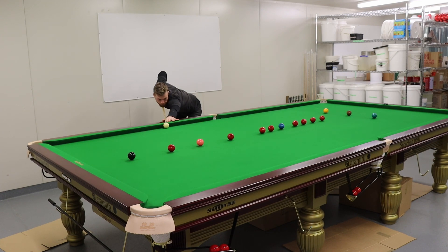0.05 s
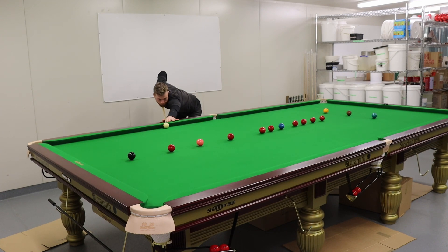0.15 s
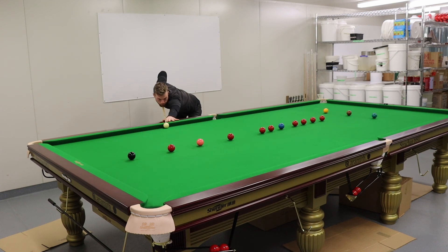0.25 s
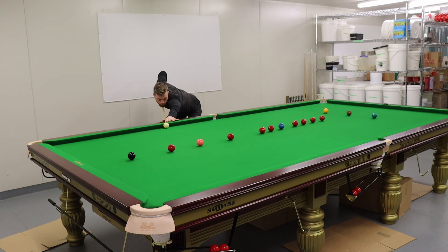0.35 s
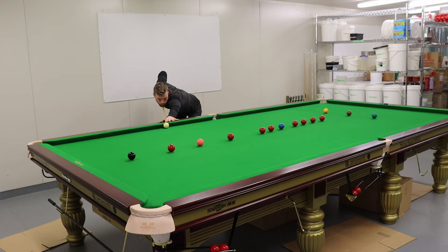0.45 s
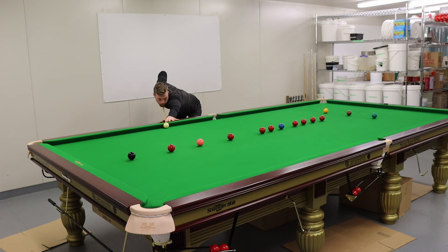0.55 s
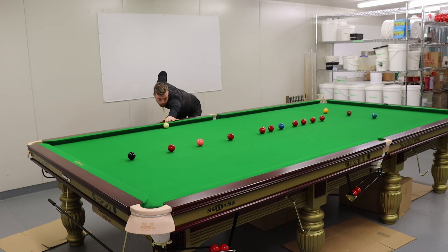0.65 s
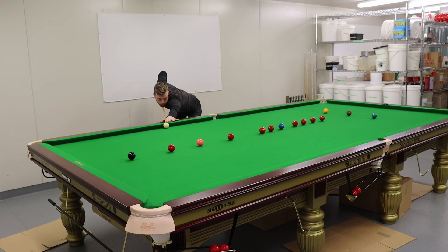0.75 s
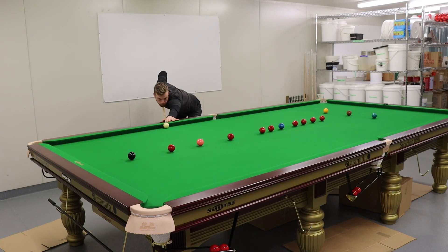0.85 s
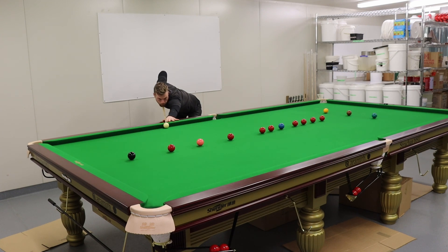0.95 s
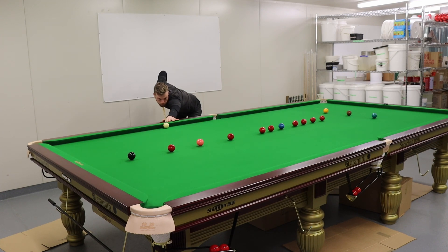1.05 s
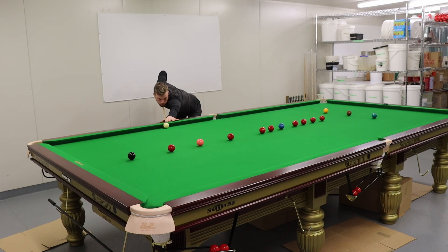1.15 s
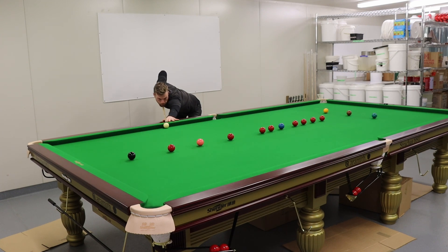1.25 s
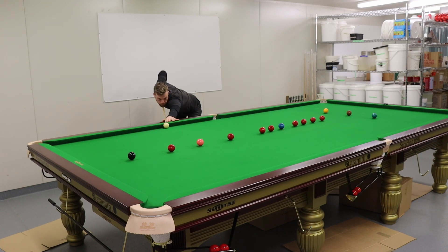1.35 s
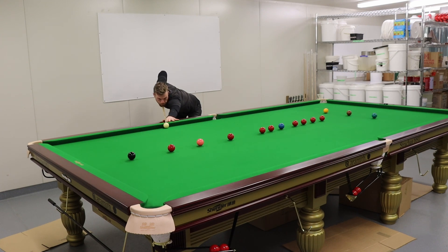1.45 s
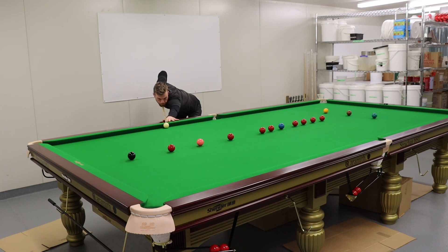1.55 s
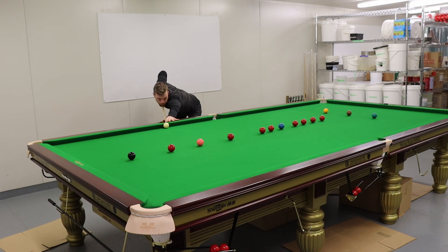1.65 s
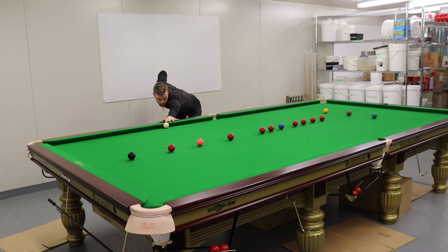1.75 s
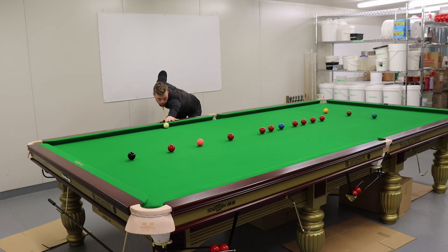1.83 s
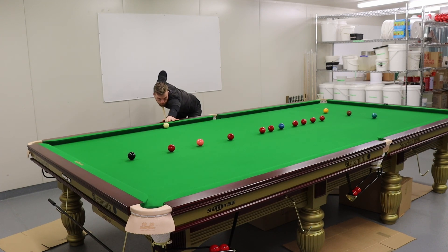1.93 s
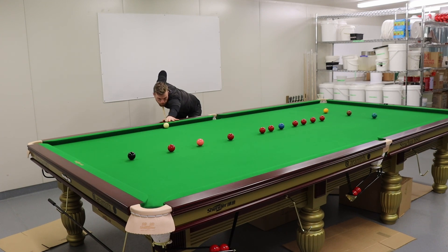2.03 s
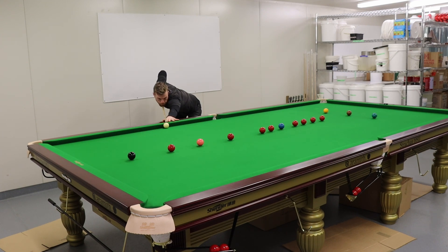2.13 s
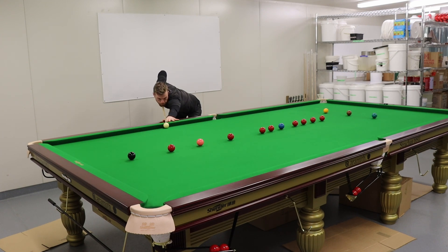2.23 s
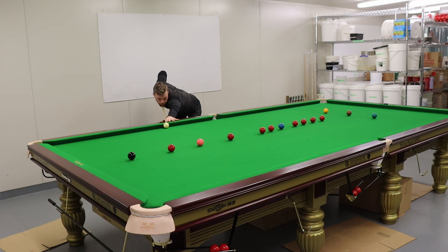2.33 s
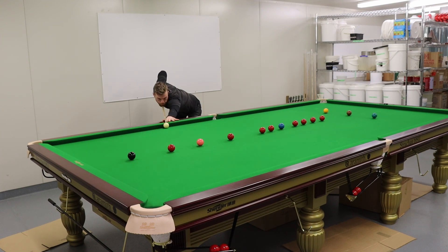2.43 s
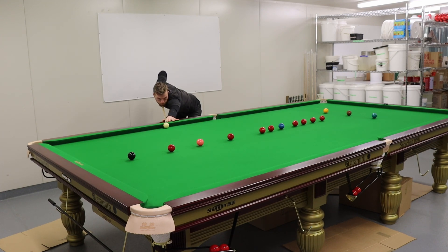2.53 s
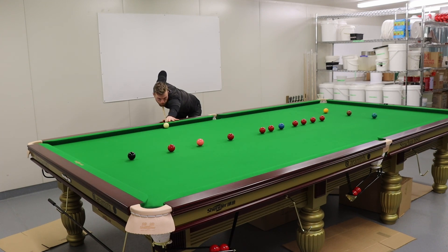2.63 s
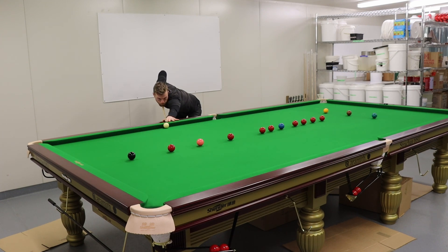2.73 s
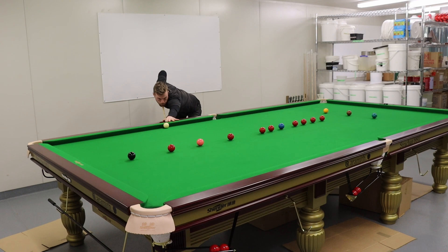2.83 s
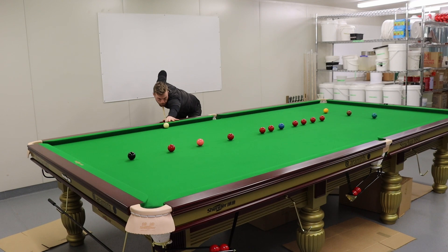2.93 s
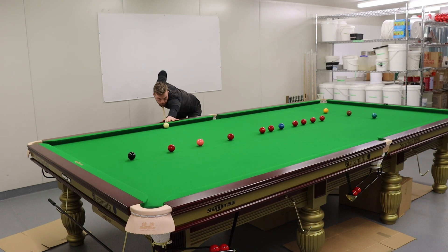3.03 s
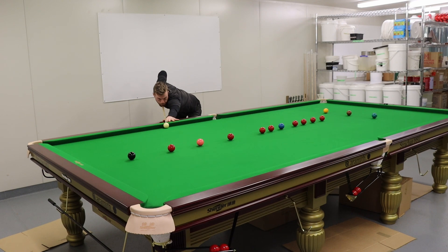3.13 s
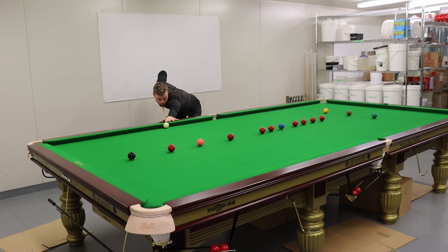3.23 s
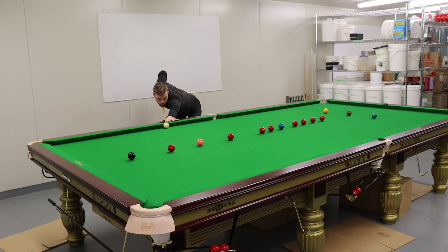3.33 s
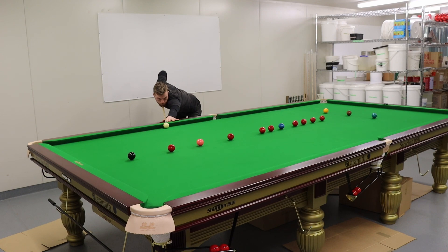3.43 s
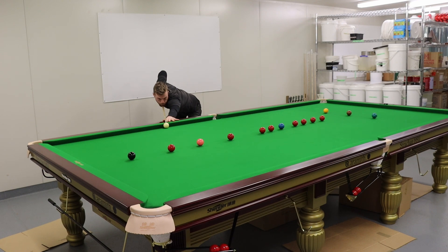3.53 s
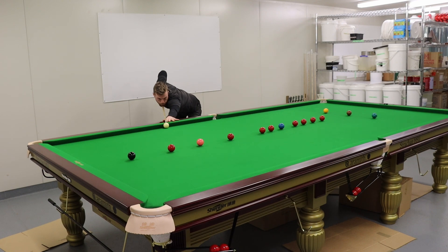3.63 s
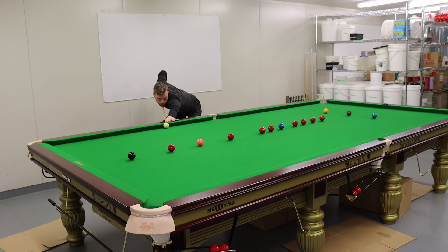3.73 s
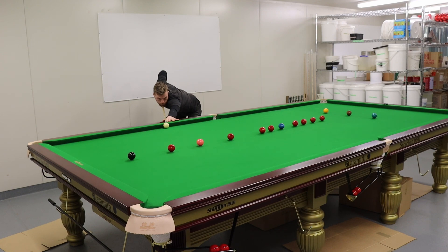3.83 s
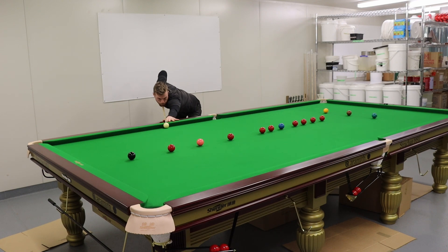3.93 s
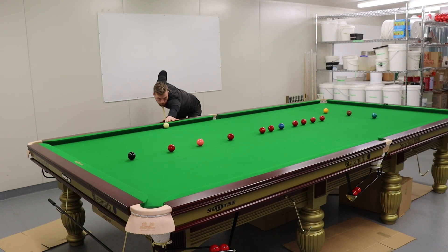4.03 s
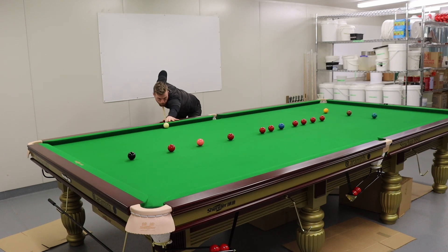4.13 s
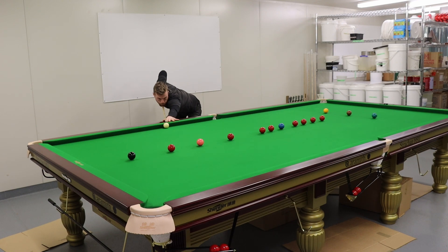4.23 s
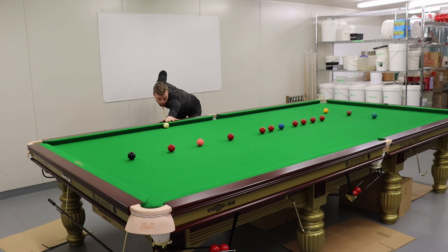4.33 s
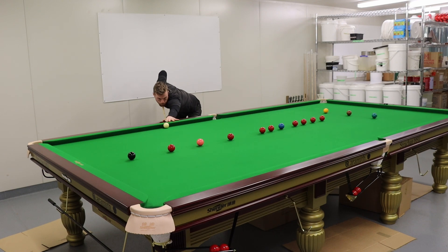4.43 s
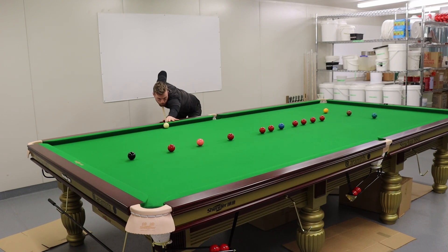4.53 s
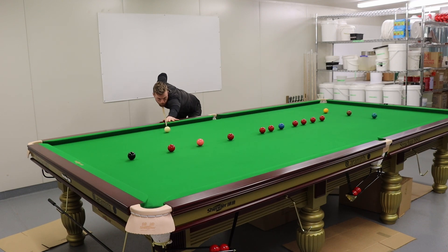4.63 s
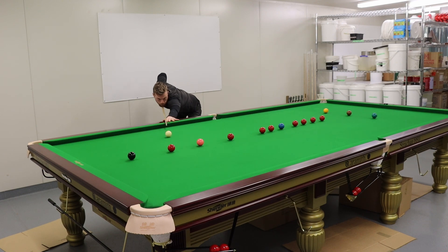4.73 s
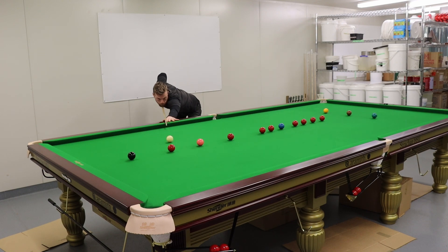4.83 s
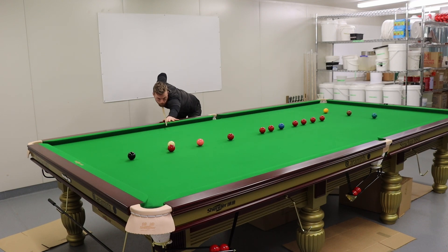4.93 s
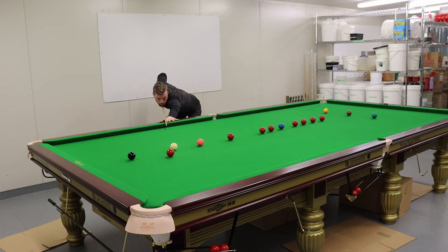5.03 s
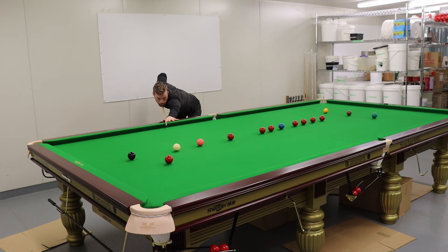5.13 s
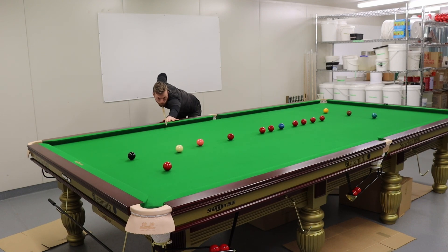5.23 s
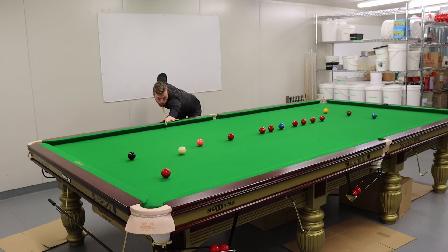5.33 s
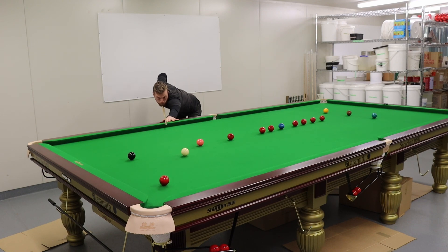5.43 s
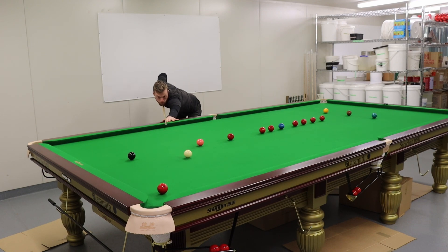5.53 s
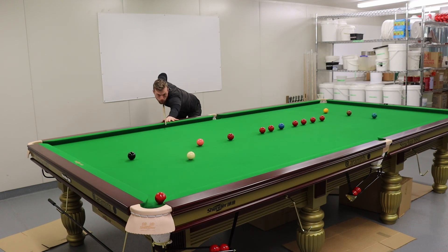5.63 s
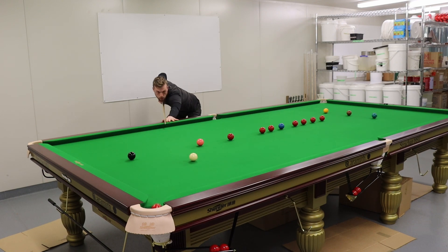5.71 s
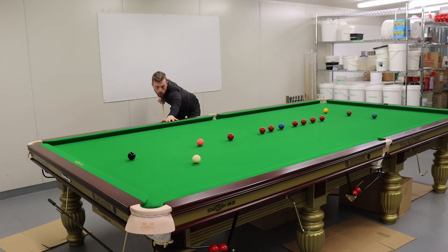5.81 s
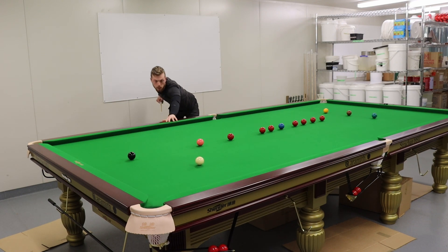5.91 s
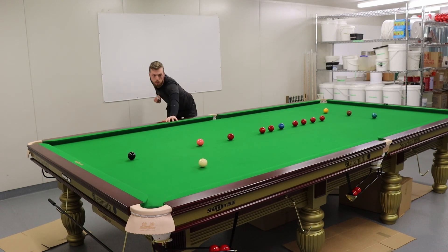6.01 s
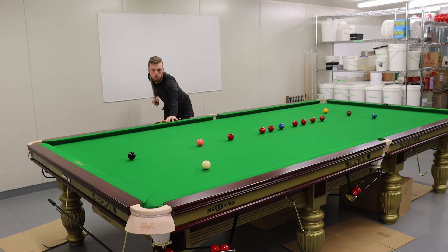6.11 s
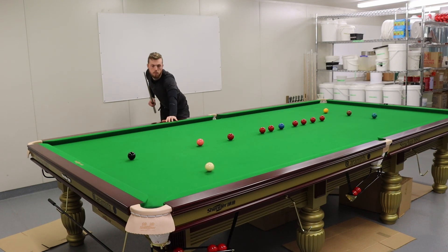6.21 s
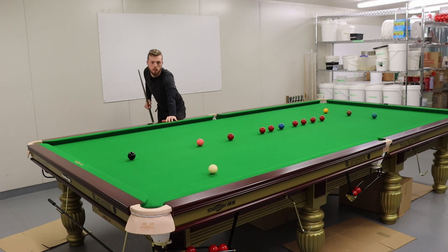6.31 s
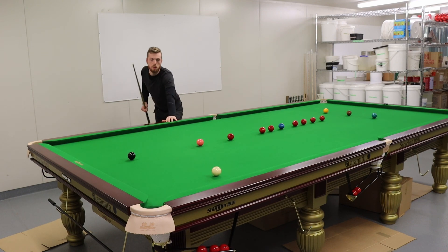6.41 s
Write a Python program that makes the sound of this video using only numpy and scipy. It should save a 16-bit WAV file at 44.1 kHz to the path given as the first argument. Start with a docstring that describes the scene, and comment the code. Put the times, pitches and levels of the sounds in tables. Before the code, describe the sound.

Low ventilation hum and faint cue strokes, then a woody cue strike, a very loud ball clack, and a red rattling into a pocket.

```python
"""Humming ventilation and soft strokes of a cue over the bridge hand open a snooker shot in a bare, ringing room.
The leather tip thuds, the cue cracks and rings (decaying sines); the cue ball clacks into a red (a filtered
contact pulse), so loud that the limiter ducks late and the clack clips. The red then rattles through the
pocket onto its wire runner (noise chatter exciting metal modes). Slides, rolling balls and air are shaped
noise; fan and duct tones waver, and a thin whine lies on top."""
import sys
import numpy as np
from scipy import signal
from scipy.io import wavfile

SR = 44100
rng = np.random.default_rng(int(sys.argv[2]) if len(sys.argv) > 2 else 0)


def dump_mix(stems):
    """Bounce the given channels to the path in sys.argv[1] as a 16-bit WAV at rate SR."""
    frames = np.atleast_2d(stems).T  # one column per channel
    limited = np.clip(frames, -1, 1)  # hard clip at full scale
    pcm = np.round(limited * 32767).astype(np.int16)
    wavfile.write(sys.argv[1], SR, pcm)


N = 285194  # length in samples

# Cue tip meeting the ball: start_s, level_db
CUE_HITS = [(4.6387, -7)]
# Bending modes of the wooden cue, some split in two by its grain: pitch_hz, level_db, t60_s
CUE_MODES = [(226, -11, .4), (263, -13, .4), (441, -20, .15), (646, -15, .15), (844, -2, .25),
             (1000, -6, .1), (1077, 1, .2), (1346, 0, .27), (1561, -7, .18), (1861, -8, .15),
             (2185, -5, .12), (2222, -3, .24), (2560, -5, .1), (2605, -3, .18), (2887, -7, .17),
             (3210, -5, .13), (3264, -3, .17), (3629, -6, .18), (4018, -9, .18), (4371, -11, .12),
             (4834, -15, .12)]


def cue_strike(tip_ms=0.44, thud_db=2.0, crack_s=0.022, crack_hz=4300, snap_db=-31.5, snap_hz=12000):
    """The leather tip thuds on the ball, the ferrule cracks and the shaft rings on in its bending modes."""
    out = np.zeros(N)
    t = np.arange(SR) / SR
    burst = rng.standard_normal(SR) * np.exp(-t / crack_s) * (1 - np.exp(-t / 0.0015))
    body = cut(burst, crack_hz, "low", order=6)
    snap = from_db(snap_db) * cut(burst, snap_hz, "low", order=6)
    crack = cut(body + snap, 500, "high")
    wood = from_db(-15) * ringing(CUE_MODES) + from_db(-2.5) * crack
    thud = cut(contact(tip_ms), 440, "high")
    for start_s, level_db in CUE_HITS:
        add(out, start_s, from_db(level_db) * wood)
        add(out, start_s, from_db(level_db + thud_db) * thud)
    return out


# Ball on ball: start_s, level_db
CLACKS = [(5.0684, 13.5)]


def ball_clack(contact_ms=0.24, radiate_hz=1900, top_hz=3200):
    """Balls are small and radiate only the fast part of their brief contact: a click of a cycle or two."""
    out = np.zeros(N)
    for start_s, level_db in CLACKS:
        radiated = cut(contact(contact_ms), radiate_hz, "high", order=3)
        click = cut(radiated, top_hz, "low", order=4)
        # the hard surfaces add a trace of treble
        tick = from_db(-17) * cut(signal.unit_impulse(len(click)), 6500, "high")
        add(out, start_s, from_db(level_db) * (click / np.abs(click).max() + tick))
    return out


# The red knocking in the pocket: start_s, level_db, decay_s (time constant), treble_db,
# runner_db (ring of the runner), hoop_db (ring of its thin wire hoop)
POCKET_KNOCKS = [(6.01, -48, 0.016, 7, -20, 12), (6.070, -25, 0.011, -9, -20, 3),
                 (6.076, -23.5, 0.0042, -1.5, -20, -5), (6.184, -27.5, 0.022, -19, -0.5, -15),
                 (6.198, -13.5, 0.005, -3, -9, -6), (6.201, -16, 0.015, -1, -12, -2),
                 (6.213, -24.5, 0.013, 7, -18, -8)]
# Tone colour of a knock: pitch_hz, gain_db
KNOCK_COLOUR = [(150, -21), (400, -6.5), (800, -5), (1500, -3), (2600, -2.5), (4200, -2), (5600, -10),
                (8000, -5.5), (12000, -6), (15500, -21)]
# Modes of the wire runner: pitch_hz, level_db, t60_s
RUNNER_MODES = [(4100, -23, .015), (4290, -23, .028), (4440, -25, .025)]
# Modes of the wire hoop: pitch_hz, level_db, t60_s
HOOP_MODES = [(8500, -35, .01), (12030, -32, .03), (12220, -33, .04)]


def pocket_rattle(grain_db=2.5, bright_hz=5000):
    """Each knock is a short chatter of tiny contacts that also sets the runner and its hoop ringing."""
    blows, metal = np.zeros(N), np.zeros(N)
    t = np.arange(SR // 4) / SR
    for start_s, level_db, decay_s, treble_db, runner_db, hoop_db in POCKET_KNOCKS:
        grain, size = rng.standard_normal((2, len(t)))
        # a second random draw makes the contacts uneven in strength
        uneven = rms_one(grain * from_db(grain_db * np.clip(size, -2, 2)))
        chatter = from_db(level_db) * uneven * np.exp(-t / decay_s)
        dull = cut(chatter, bright_hz, "low", order=1)
        add(blows, start_s, dull + from_db(treble_db) * (chatter - dull))
        wires = from_db(runner_db) * ringing(RUNNER_MODES) + from_db(hoop_db) * ringing(HOOP_MODES)
        add(metal, start_s, signal.fftconvolve(chatter, wires))
    knocks = np.zeros(N)
    for k, hz in enumerate(CENTRES_HZ):
        # neighbouring bands alternate in sign
        knocks += (-1) ** k * from_db(at_hz(KNOCK_COLOUR, hz)) * cut(blows, band_edges(hz), "band")
    return knocks + metal


# Strokes of the cue over the bridge hand, the last one the shot: middle_s, level_db, length_s
STROKES = [(.06, -59, .13), (1.09, -65, .24), (1.56, -61.5, .14), (1.94, -63.5, .2), (2.39, -59, 0.14),
           (2.67, -62.5, 0.15), (3.14, -64, 0.21), (4.29, -64.5, .33), (4.63, -58, 0.073)]
# Faint rustle of the player at rest; it grows as he straightens up
REST_DB, RISE_START_S, RISE_DB_PER_S = -79, 5.09, 20


def rubbing():
    """Gain of the friction noise: the strokes of the cue, joined by the player getting up."""
    rising_s = np.maximum(np.arange(N) / SR - RISE_START_S, 0)
    rustle = from_db(REST_DB + RISE_DB_PER_S * rising_s)
    return np.hypot(swells(STROKES), rustle)


# Colour of the sliding cue and the rustle: pitch_hz, density_db (relative, per Hz)
RUB_COLOUR = [(800, -17), (2200, 1.5), (3200, 7.5), (4500, 2), (8500, -3), (12300, 2.5), (15000, -26)]


def cue_slide():
    """Friction of cue and clothing: coloured noise that follows the speed of the movements."""
    return rubbing() * coloured_noise(RUB_COLOUR)


# Low bumps as the red enters the pocket and rolls off along the runner: middle_s, level_db, length_s
BUMPS = [(5.96, -46, .13), (6.105, -40.5, 0.041), (6.19, -39.5, 0.075), (6.45, -39.5, 0.12)]
# The slate rumbles once the cue ball is sent off and again when the red drops
SLATE_SHOT_DB, SLATE_DROP_DB = -51.5, -53


def rolling_balls():
    """Rolling weight shakes the slate in the deep bass and bumps the pocket a little higher up."""
    shot = roll(CUE_HITS[0][0], SLATE_SHOT_DB)
    drop = roll(POCKET_KNOCKS[1][0], SLATE_DROP_DB)
    slate = rumble(np.hypot(shot, drop), low_hz=28, high_hz=72.0)
    return slate + rumble(swells(BUMPS), low_hz=174, high_hz=300)


def roll(start_s, level_db, build_s=0.02, fade_db_per_s=16):
    """Gain of a ball set rolling: a quick build-up, then a steady fade as it slows."""
    age_s = np.maximum(np.arange(N) / SR - start_s, 0)
    return from_db(level_db - fade_db_per_s * age_s) * (1 - np.exp(-age_s / build_s))


def rumble(gain, low_hz, high_hz):
    """Low noise of a rolling ball: one band of noise under a gain curve."""
    return gain * rms_one(cut(rng.standard_normal(N), [low_hz, high_hz], "band"))


def swells(rows):
    """Gain of movements that speed up and slow down again: one bell per row."""
    t = np.arange(N) / SR
    gain = np.zeros(N)
    for middle_s, level_db, length_s in rows:
        gain += from_db(level_db) * np.exp(-2 * ((t - middle_s) / length_s) ** 2)
    return gain


# Ventilation and hiss: pitch_hz, density_db (relative, per Hz)
AIR_COLOUR = [(25, -31), (64, -22), (90, -15.5), (150, -3.5), (230, -7), (300, -12), (450, -16.5),
              (600, -20.5), (800, -22), (1800, -27), (2250, -38), (4000, -42.5), (8000, -47.5),
              (15500, -51)]
# Fan and duct tones: pitch_hz, level_db (rms before the stereo tilt), waver_hz (cutoff of the wavering)
HUM_TONES = [(97.4, -50.5, 5.6), (151.4, -45.5, 10.6), (231.1, -49.5, 11.8), (353, -50.5, 5),
             (450, -60.5, 7.2), (557.6, -56.5, 3.57), (612, -60.5, 25.5)]


def ventilation(air_db=-41.5, whine_hz=10874, whine_db=-87, tilt_db=1.5):
    """Rushing air, fan and duct tones wavering in strength and phase, and a thin electrical whine."""
    t = np.arange(N) / SR
    out = from_db(air_db) * coloured_noise(AIR_COLOUR)
    for hz, level_db, waver_hz in HUM_TONES:
        # slow noise on cosine and sine; the filter's first second is dropped
        a, b = cut(rng.standard_normal((2, N + SR)), waver_hz, "low")[:, SR:]
        tone = a * np.cos(2 * np.pi * hz * t) + b * np.sin(2 * np.pi * hz * t)
        out = out + from_db(level_db) * rms_one(tone)
    out = out + from_db(whine_db) * rms_one(np.sin(2 * np.pi * whine_hz * t))
    return out * from_db([[tilt_db / 2], [-tilt_db / 2]])


# First reflections, off the table and walls: delay_ms, left_db, right_db
ECHOES = [(2.7, -19, -1), (3.6, -0.5, -17.5), (5.1, 0.5, -35), (6.1, -4, -38), (7.9, -31, -6),
          (10.3, -34, -10), (14.6, -20, -27), (16.5, -10, -6.5)]


def in_room(x, echo_db, wet_db, pan_db):
    """Direct sound, first reflections and the diffuse tail at the two microphones."""
    response = from_db(wet_db) * room_tail()
    response[:, :2] += [[1, 0.006], [0.26, 0.57]]  # direct sound reaches the right microphone a little later
    for delay_ms, left_db, right_db in ECHOES:
        response[:, round(delay_ms * SR / 1000)] += from_db(echo_db + np.array([left_db, right_db]))
    heard = signal.fftconvolve(x[None], response, axes=1)[:, :N]
    return heard * from_db([[pan_db / 2], [-pan_db / 2]])


# Reverberation: pitch_hz, t60_s
ROOM_T60 = [(150, 1.16), (500, 0.66), (1200, 0.75), (2400, 0.95), (4000, 0.73), (7000, 0.53), (13000, 0.32)]


def room_tail(build_s=0.0041, early_db=10.0, early_s=0.0076):
    """Diffuse response of unit energy: it builds up, is boosted early on and dies soonest in the top treble."""
    t = np.arange(3 * SR // 2) / SR
    tail = sum(from_db(-60 * t / at_hz(ROOM_T60, hz)) * band for hz, band in stereo_bands(len(t)))
    tail = tail * (1 - np.exp(-t / build_s)) * from_db(early_db * np.exp(-t / early_s))
    return rms_one(tail) / np.sqrt(len(t))


def coloured_noise(spectrum):
    """Diffuse stereo noise of a given colour, rms 1."""
    return rms_one(sum(from_db(at_hz(spectrum, hz)) * band for hz, band in stereo_bands(N)))


# Likeness of the two channels in diffuse sound: pitch_hz, correlation (no unit)
LIKENESS = [(60, 0.93), (150, .96), (350, 0.89), (700, 0.34), (1400, 0.3), (2800, 0), (6000, 0),
            (14000, 0.032)]
CENTRES_HZ = 25 * 2 ** (np.arange(29) / 3)  # third-octave band centres


def stereo_bands(size):
    """Third-octave bands of stereo noise, alike in the bass and nearly unrelated in the treble."""
    white = rng.standard_normal((2, 2, size + SR // 4))  # the spare quarter second lets the filters settle
    for k, hz in enumerate(CENTRES_HZ):
        # neighbouring bands draw on separate noise
        mid, side = cut(white[k % 2], band_edges(hz), "band")[:, -size:]
        alike = np.clip(at_hz(LIKENESS, hz), -1, 1)
        yield hz, np.sqrt(1 + alike) * mid + np.sqrt(1 - alike) * side * [[1], [-1]]


def band_edges(hz):
    """Edges in Hz of the third-octave band around a centre."""
    return hz * 2 ** (np.array([-1, 1]) / 6)


def contact(ms):
    """Force between two elastic bodies: a half sine to the power 3/2."""
    phase = np.minimum(np.arange(SR // 50) * 1000 / (SR * ms), 1)
    return np.abs(np.sin(np.pi * phase)) ** (3 / 2)


def ringing(modes):
    """One second of a struck body: decaying sines of alternating sign."""
    t = np.arange(SR) / SR
    out = np.zeros(SR)
    for k, (hz, level_db, t60_s) in enumerate(modes):
        out += (-1) ** k * from_db(level_db - 60 * t / t60_s) * np.sin(2 * np.pi * hz * t)
    return out


def from_db(db):
    """Decibels to gain."""
    return 10 ** (np.asarray(db) / 20)


def rms_one(x):
    """Scale to rms 1."""
    return x / np.sqrt(np.mean(x ** 2) + 1e-20)


def at_hz(points, hz):
    """Read a table on a log-frequency axis."""
    table = np.array(points)
    return np.interp(np.log(hz), np.log(table[:, 0]), table[:, 1])


def cut(x, hz, kind, order=2):
    """Butterworth filter."""
    sos = signal.butter(order, np.minimum(hz, SR / 2 - 1), kind, fs=SR, output="sos")
    return signal.sosfilt(sos, x + 1e-18)


def add(track, start_s, sound):
    """Mix a sound into the track from start_s on."""
    start = round(start_s * SR)
    track[..., start:start + sound.shape[-1]] += sound[..., :N - start]


def scene():
    """The cue at the far side of the table has strong reflections and tail; the pocket close by is drier."""
    cue = in_room(cue_strike(), echo_db=-1.5, wet_db=3.5, pan_db=0.9)
    clack = in_room(ball_clack(), echo_db=-5.0, wet_db=-2.0, pan_db=0.5)
    pocket = in_room(pocket_rattle(), echo_db=-12.5, wet_db=-1.5, pan_db=0.5)
    return cue + clack + pocket + cue_slide() + rolling_balls() + ventilation()


def record(dry, limit_db=3.5, release_db_per_s=72.0, attack_s=0.0023, hold_s=0.018, cutoff_hz=15600):
    """A limiter ducks too late for the clack, which clips, then holds and recovers; the top is cut."""
    peak_db = 20 * np.log10(np.abs(dry).max(axis=0) + 1e-9)
    over_db = np.maximum(peak_db - limit_db, 0)
    # the reduction falls back at a steady rate after each peak
    ramp_db = release_db_per_s * np.arange(N) / SR
    falling_db = np.maximum.accumulate(over_db + ramp_db) - ramp_db
    delayed_db = np.interp(np.arange(N) - hold_s * SR, np.arange(N), falling_db)
    held_db = np.maximum(falling_db, delayed_db)
    # the smoothed attack lets the first edge through
    pole = np.exp(-1 / (attack_s * SR))
    reduction_db = signal.lfilter([1 - pole], [1, -pole], held_db)
    clipped = np.clip(dry * from_db(-reduction_db), -1, 1)
    return signal.sosfilt(signal.ellip(10, .1, 80, cutoff_hz, fs=SR, output="sos"), clipped)


dry = scene()
out = record(dry)
dump_mix(out)
```